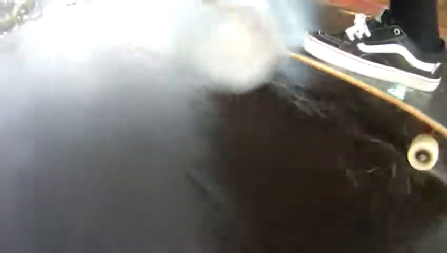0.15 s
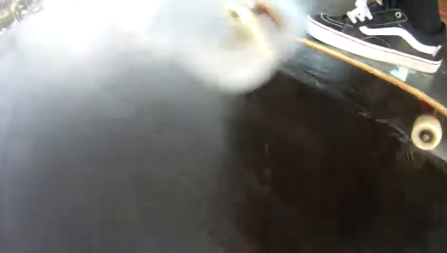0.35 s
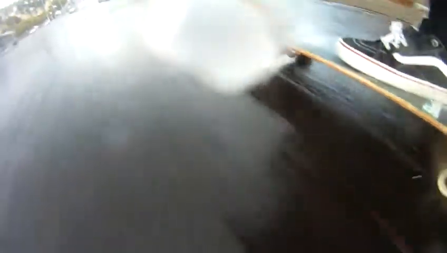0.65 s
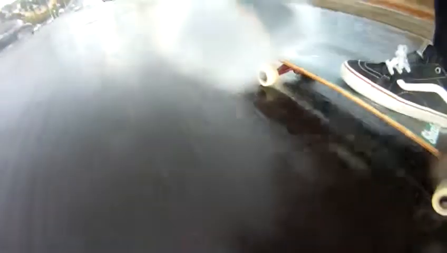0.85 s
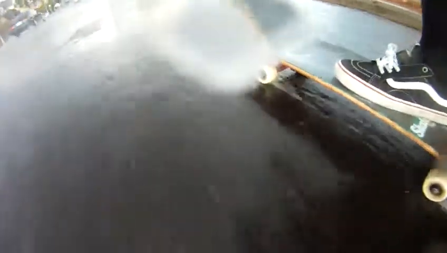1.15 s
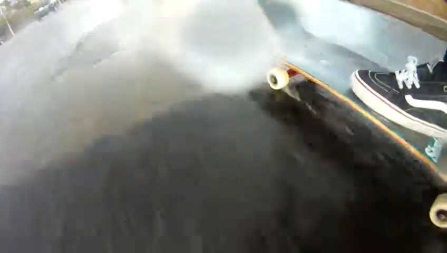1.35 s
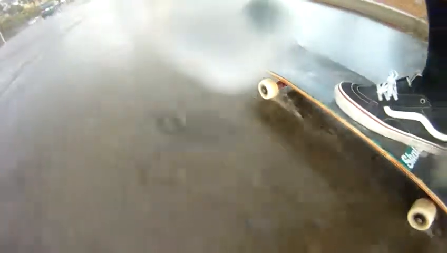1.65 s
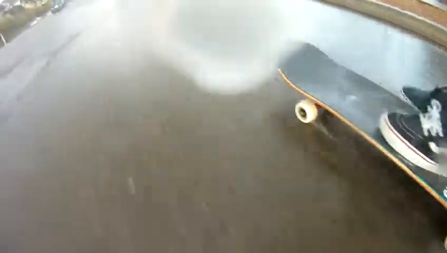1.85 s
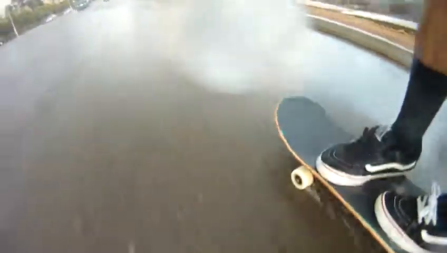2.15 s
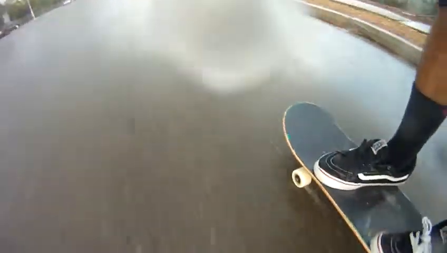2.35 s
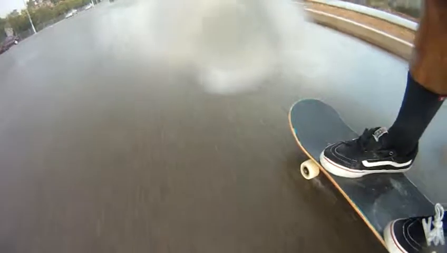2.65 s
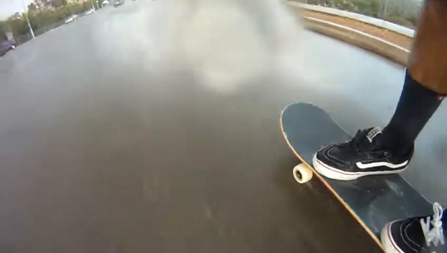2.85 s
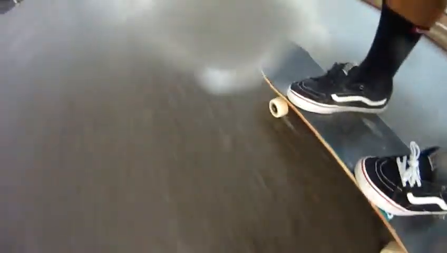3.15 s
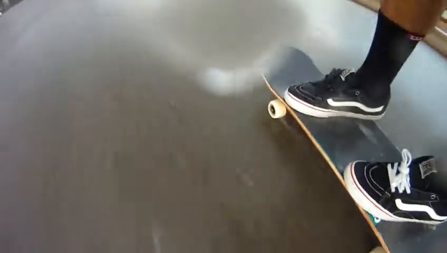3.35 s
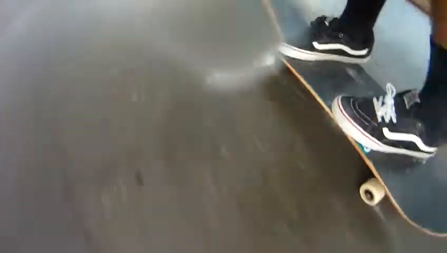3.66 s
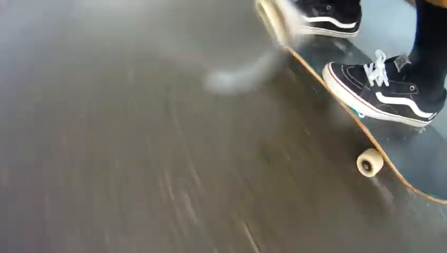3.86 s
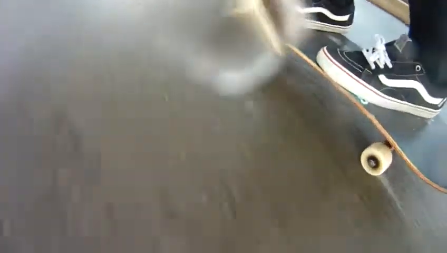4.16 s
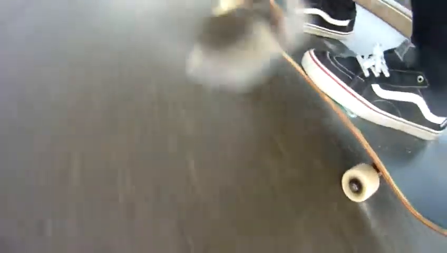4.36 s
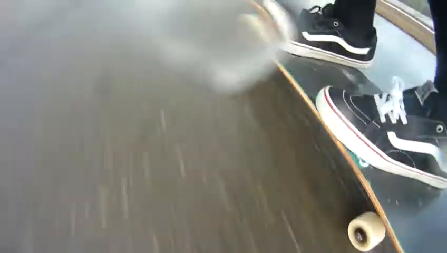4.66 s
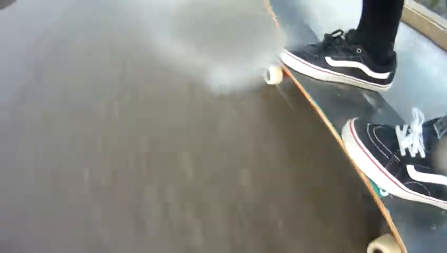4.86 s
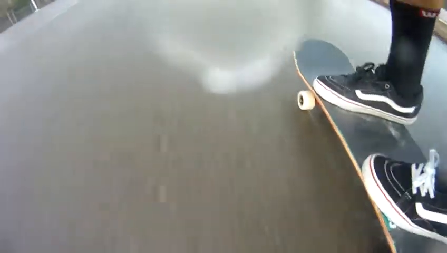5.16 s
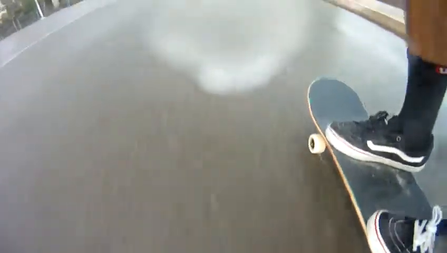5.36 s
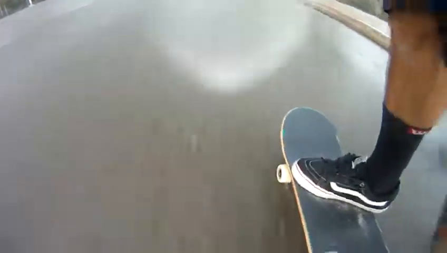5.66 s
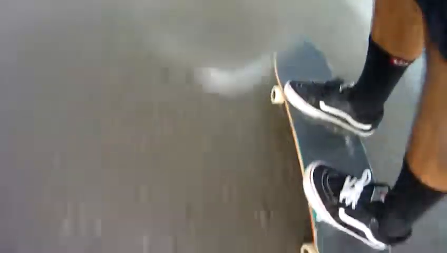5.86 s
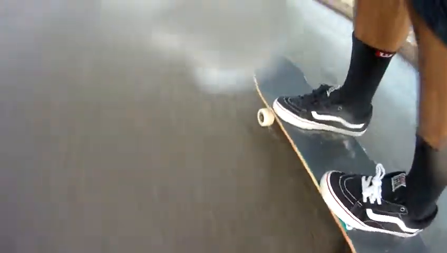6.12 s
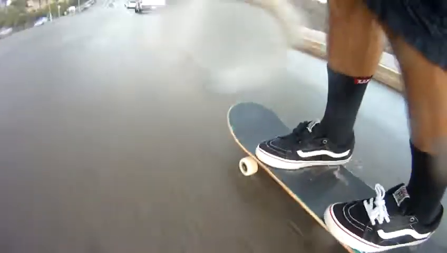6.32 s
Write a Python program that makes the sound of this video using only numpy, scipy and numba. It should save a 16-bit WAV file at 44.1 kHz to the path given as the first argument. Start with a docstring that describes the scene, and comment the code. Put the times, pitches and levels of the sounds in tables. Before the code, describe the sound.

A close skateboard rolls along a wet street, water hissing and crackling off its wheels while drops and grit tick sharply.

```python
"""A skateboard rolls over wet asphalt, heard through a small camera right beside the wheels.
The rough road makes the wooden deck drum. Water crackles and sprays off the wheels and rings in the
camera's case, while flung grit and drops click against it. Behind this are low wind and a few dull
knocks from the trucks (the axle mounts). The camera's coarse sampling adds a gritty sheen on top."""
import sys
import numpy as np
from scipy import signal
from scipy.fft import rfft, irfft
from scipy.io import wavfile
from numba import njit

SR = 44100
rng = np.random.default_rng(int(sys.argv[2]) if len(sys.argv) > 2 else 0)


def digitize_waveform(pressure):
    """Quantize a signal to 16-bit integers and store it at the path in sys.argv[1].

    Rows of a 2-D input are taken as channels; values are limited to [-1, 1].
    """
    field = np.atleast_2d(pressure).T
    bounded = np.clip(field, -1, 1)
    quanta = np.round(bounded * 32767).astype(np.int16)
    wavfile.write(sys.argv[1], SR, quanta)


N = 286209
T = np.arange(N) / SR


def gain(db):
    """Turn decibels into a number to multiply by."""
    return 10 ** (np.asarray(db) / 20)


def unit(x):
    """Scale a signal so its average strength (rms) is 1."""
    return x / np.sqrt(np.mean(x ** 2))


def curves(table):
    """Join a table's points with straight lines; the first column is the time."""
    times_s, *columns = np.transpose(table)
    return [np.interp(T, times_s, column) for column in columns]


def band(x, low_hz, high_hz, order=2):
    """Keep the sound between two pitches."""
    return signal.sosfilt(signal.butter(order, [low_hz, high_hz], "band", fs=SR, output="sos"), x)


def ring(x, tones):
    """Make a signal ring at an object's own tones; neighbouring tones swing opposite ways."""
    out = 0
    for k, (pitch_hz, width_hz, level_db) in enumerate(tones):
        peak = signal.iirpeak(pitch_hz, pitch_hz / width_hz, SR)
        out = out + (-1) ** k * gain(level_db) * signal.lfilter(*peak, signal.lfilter(*peak, x))
    return out


def wander(rate_hz):
    """A smooth random wobble of strength 1; a higher rate wobbles faster."""
    hz = np.arange(N // 2 + 1) * SR / N
    spectrum = rfft(rng.standard_normal(N)) * (hz > 1) / (1 + (hz / rate_hz) ** 2)
    return unit(irfft(spectrum, N))


def grains(per_s, spread_db):
    """Tiny taps at random moments, of very unequal size."""
    taps = (rng.random(N) < per_s / SR) * rng.standard_normal(N)
    return unit(taps * gain(spread_db * rng.standard_normal(N)))


@njit
def follow(x, rise_s, fall_s):
    """Follow a level, with one delay going up and another coming down."""
    out, level = np.empty(len(x)), 0.
    for i in range(len(x)):
        level += (x[i] - level) / (SR * (rise_s if x[i] > level else fall_s))
        out[i] = level
    return out


# Gusts on top of a steady headwind: peak_s, length_s, rise_db
GUSTS = [(.25, 0.58, 8), (4.0, 0.25, 5), (6.248, 1, 8)]

def wind(headwind_db=-48.5):
    """Moving air buffets the case, low and dull, over a faint rumble; each gust swells and fades."""
    gusts_db = sum(rise_db * np.exp(-(2 * (T - peak_s) / length_s) ** 2)
                   for peak_s, length_s, rise_db in GUSTS)
    buffet = unit(band(rng.standard_normal(N), 30, 54))
    rumble = unit(band(rng.standard_normal(N), 6, 110))
    return gain(headwind_db + gusts_db) * (buffet + gain(-9) * rumble)


# Knocks from the trucks: start_s, peak_db
KNOCKS = [(4.335, -21), (4.431, -18), (5.877, -41)]
# The tones a knock sets ringing: pitch_hz, width_hz, level_db
THUMP_TONES = [(130, 110, -6), (290, 250, -5), (715, 190, -4)]

def truck_knocks():
    """As the rider leans, a truck shifts on its rubber cushion and thumps the deck."""
    blows = np.zeros(N)
    for start_s, peak_db in KNOCKS:
        blows[int(start_s * SR)] = gain(peak_db)
    thump = ring(signal.unit_impulse(SR // 8), THUMP_TONES)
    return signal.fftconvolve(blows, thump / np.abs(thump).max())[:N]


def stray_drops(spray_db, per_s=3, low_hz=1320, high_hz=3260):
    """Small drops land at random, harder when more spray flies."""
    drops = []
    crack_db, crack_hz = -5, 2820
    for when, pitch, size in rng.random((int(per_s * N / SR), 3)):
        i = int(when * N)
        level_db = spray_db[i] + 17 + 4 * size
        ring_hz = low_hz * (high_hz / low_hz) ** pitch
        drops.append((T[i], level_db, ring_hz, crack_db, crack_hz))
    return clicks(drops)


# Grit and drops hitting the board and case: start_s, level_db, ring_hz, crack_db, crack_hz
# (crack_db says how much louder the crack is than the ring)
GRIT_HITS = [(.2745, -12.5, 1580, -3.5, 2700), (.725, -18, 1580, -12, 2400), (.874, -12, 1120, -10, 2200),
             (1.162, -14, 1100, -35, 2200), (1.236, -23, 1560, -11, 2400), (1.3598, -5, 2030, -5, 2590),
             (1.486, -9, 1080, -7, 2200), (1.5824, -6.5, 1130, -13, 1970), (1.586, -13.5, 2140, -3.5, 2700),
             (2.0738, -10, 1210, 2, 2140), (2.5749, -19.5, 1280, -2.5, 2870), (2.627, -21, 1100, 1, 3500),
             (2.8385, -14, 1485, 2, 2300), (2.946, -19, 1970, -2, 2700), (2.959, -23, 2150, 3, 2700),
             (2.988, -24.5, 1600, 4, 3000), (3.2622, -8, 1190, -7.5, 2650), (3.327, -13.5, 1100, -27, 2200),
             (3.845, -15, 1120, -14, 2200), (4.100, -19, 1730, -7, 2400), (4.336, -7, 1180, -21, 1800),
             (4.4021, -9.5, 1530, 0.5, 2090), (4.4316, -7.5, 1110, -4.5, 2190), (4.5287, -7, 2200, 1, 3860),
             (4.537, -13, 2070, -3, 2800), (4.622, -14.5, 1540, -14, 2400), (4.666, -11.5, 1280, 2, 2830),
             (4.733, -10, 1530, -4, 3020), (4.8459, -10.5, 1200, 2, 2680), (4.9682, -20.5, 2660, -12, 3300),
             (5.0914, -13.5, 2130, -14, 2400), (5.1205, -8, 1160, -12, 2200),
             (5.3703, -14.5, 1620, 1, 2900), (5.5386, -14.5, 2080, 2.5, 2400),
             (5.6155, 14.5, 1994, 4, 2300), (5.9158, -12, 1520, -8, 2640), (6.016, -12.5, 1105, -17, 2200)]

def clicks(hits, bounce_s=.0018, bounce_gain=0.61):
    """Each hit cracks, rings briefly at its own pitch, and bounces once."""
    out, t = np.zeros(N + SR), T[:SR // 20]
    for start_s, level_db, ring_hz, crack_db, crack_hz in hits:
        fade_s = 0.0075 * 2 ** (-crack_db / 34)  # time to fall 60 dB; softer contact rings longer
        tone = np.sin(2 * np.pi * ring_hz * t) * gain(-60 * t / fade_s)
        # smaller, harder grains crack higher
        crack = band(signal.unit_impulse(len(t)), crack_hz / 1.39, crack_hz * 1.36)
        click = gain(level_db) * (tone - gain(crack_db) * crack / np.abs(crack).max())
        start = int(start_s * SR)
        bounce = start + int(SR * np.round(bounce_s * ring_hz) / ring_hz)  # in step with the ring
        out[start:start + len(t)] += click
        out[bounce:bounce + len(t)] += bounce_gain * click
    return band(out[:N], 910, 6200)


# How much water the wheels throw: time_s, crackle_db, spray_db
WATER_LEVELS = [(0, -34.5, -44), (0.3, -31.5, -40), (1.2, -31.5, -44), (1.45, -29.5, -41),
                (1.75, -36.5, -46.5), (2.35, -36, -50.5), (3.0, -32, -46), (3.2, -34.0, -47),
                (3.6, -32, -45.5), (4.1, -34.5, -45.5), (4.5, -30, -41.5), (4.75, -29.0, -42.5),
                (5.0, -29, -44.5), (5.3, -26, -43.5), (5.75, -30, -48), (6.49, -27, -42.5)]
# The tones of the camera's case: pitch_hz, width_hz, level_db
CASE_TONES = [(1075.5, 156, 0.5), (1211, 106, -0.3), (1557, 204, -2), (2104, 268, -4.5), (2440, 530, -18),
              (2775, 71, -13)]
# Spray off the near wheels: pitch_hz, width_hz, level_db
SPRAY_TONES = [(3094, 460, -4.5), (3597, 334, 1), (3950, 180, -13)]
# The finest mist: pitch_hz, width_hz, level_db
MIST_TONES = [(4270, 280, -11), (4730, 270, -1), (5080, 440, 4), (5480, 1180, -2.5)]

def water(crackle_db, spray_db, wheel_turns_hz=10.2):
    """The film of water tears off the wheels in spurts, a little more once on each turn."""
    turns = np.cumsum(wheel_turns_hz * (1 + 0.13 * wander(.8))) / SR
    spurts = unit(gain(2 * wander(60) + 0.68 * np.cos(np.pi * turns) ** 10))
    splashes = grains(per_s=4500, spread_db=2.5) * spurts
    crackle = unit(band(ring(splashes, CASE_TONES), 1000, 3200, order=5))
    spray = unit(ring(grains(per_s=6000, spread_db=2) * spurts, SPRAY_TONES))
    mist = unit(ring(grains(per_s=7000, spread_db=4) * spurts, MIST_TONES))
    far_wheel_hiss = unit(band(rng.standard_normal(N), 880, 5400))
    haze = mist * gain(-47.5) + far_wheel_hiss * gain(-48)
    haze_swell = gain(0.79 * (spray_db - spray_db.mean()))  # grows more slowly than the spray
    return crackle * gain(crackle_db) + spray * gain(spray_db + .5) + haze * haze_swell


# How hard the road shakes the wheels, growing with speed: time_s, level_db
ROAD_SHAKE = [(0, -38.5), (0.45, -40), (0.9, -36.5), (1.45, -35.5), (1.98, -40), (2.12, -36.5),
              (2.33, -40.5), (2.45, -31.5), (3.5, -30.5), (4.05, -34), (4.7, -28), (5.0, -29.5), (5.3, -26),
              (5.55, -27.5), (5.85, -25), (6.05, -28.5), (6.49, -27.0)]
# The tones of the shaken deck and trucks: pitch_hz, width_hz, level_db
DECK_TONES = [(495.6, 207, -6.5), (726, 242, 0.0), (914, 130, -10.5)]
# The low tones of the deck as it bends: pitch_hz, width_hz, level_db
BOOM_TONES = [(140.6, 54, -10.5), (234.5, 133, -11.5), (372.6, 150, 0.5)]

def wheels(evens_out_s=1.61, evening_length_s=0.2):
    """Stones in the asphalt kick the hard wheels, and the trucks pass the shaking to the deck."""
    road_db, = curves(ROAD_SHAKE)
    kicks = grains(per_s=5000, spread_db=1.5) * gain(wander(23))
    rumble = unit(band(ring(kicks, DECK_TONES), 300, 960, order=5))
    boom = unit(ring(grains(per_s=3000, spread_db=2.5), BOOM_TONES))
    # the deck booms more on the first, bumpier stretch, then the road evens out
    bumpy = np.clip(.5 - (T - evens_out_s) / evening_length_s, 0, 1)
    boom_db = -45 + 7.5 * bumpy + 0.15 * (road_db - road_db.mean())
    return rumble * gain(road_db + .5) + boom * gain(boom_db)


def scene():
    """Wheels, water, wind, clicks and knocks, all close to one microphone."""
    crackle_db, spray_db = curves(WATER_LEVELS)
    rolling = wheels() + water(crackle_db, spray_db) + wind()
    return (rolling + clicks(GRIT_HITS) + stray_drops(spray_db) + truck_knocks())[None]


def record(dry):
    """The camera turns itself down after loud clicks, cuts off peaks and samples coarsely."""
    limit_db, camera_hz, top_hz = -13, 12000, 15300
    loudness = follow(np.abs(dry[0]), rise_s=.004, fall_s=.012)
    limited = np.clip(dry[0] / np.maximum(1, loudness / gain(limit_db)), -1, 1)
    coarse = signal.resample_poly(limited, camera_hz, SR)
    # holding each sample makes little steps, which mirror the sound into the treble
    held = signal.resample_poly(np.repeat(coarse, 8), SR, 8 * camera_hz)
    treble_cut = signal.ellip(10, .2, 70, top_hz, fs=SR, output="sos")
    return signal.sosfilt(treble_cut, np.clip(held, -.9, .9))[None]


dry = scene()
out = record(dry)
digitize_waveform(out)
```